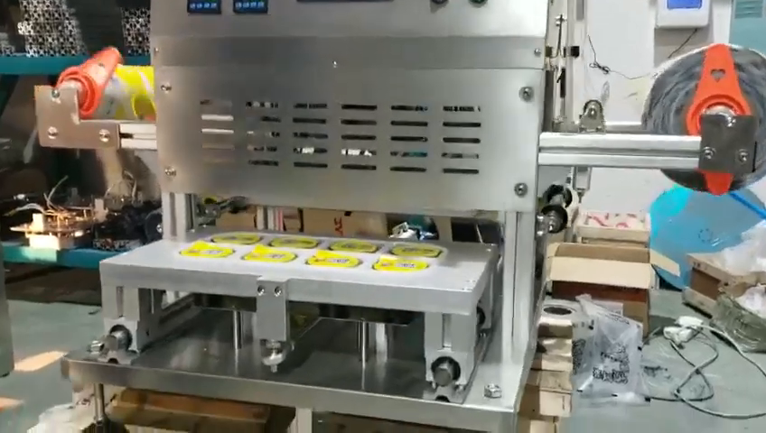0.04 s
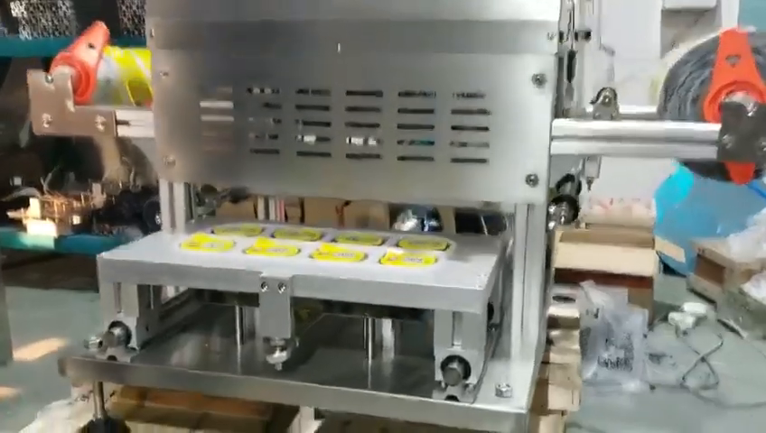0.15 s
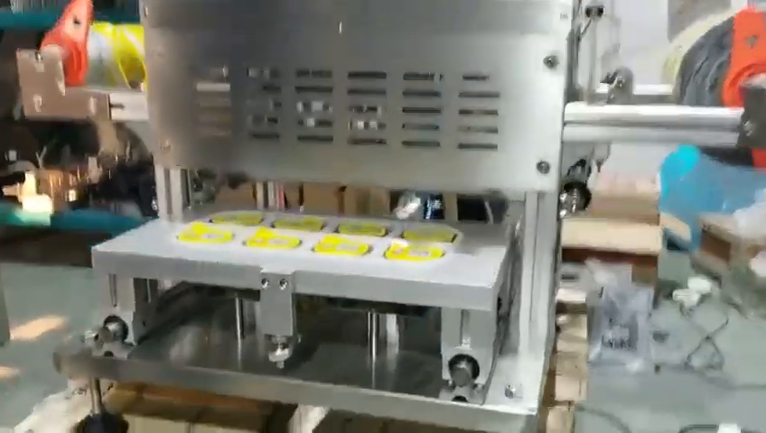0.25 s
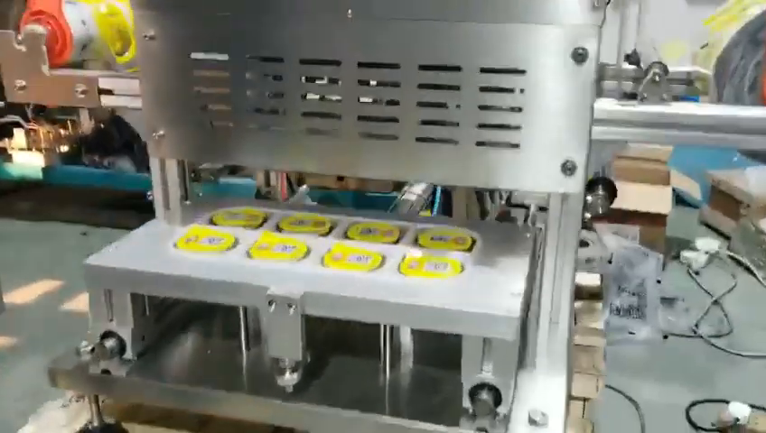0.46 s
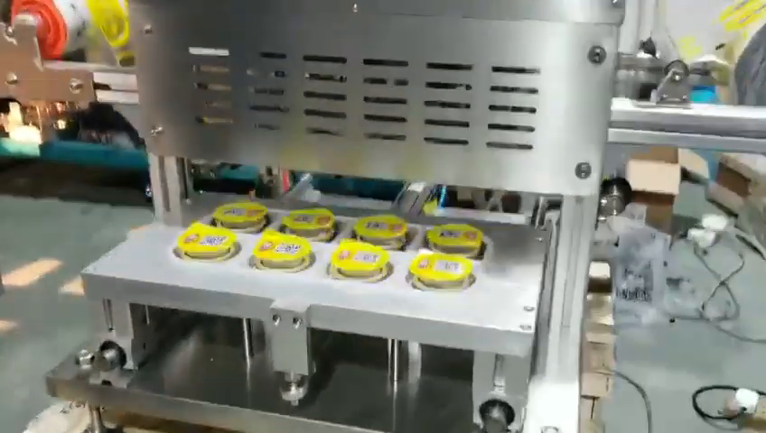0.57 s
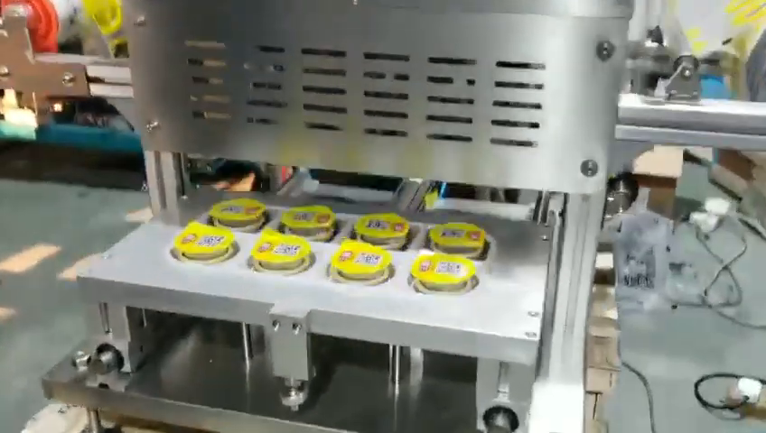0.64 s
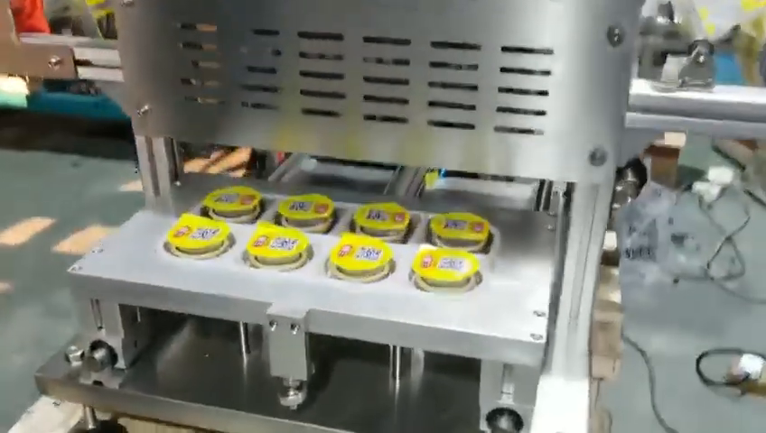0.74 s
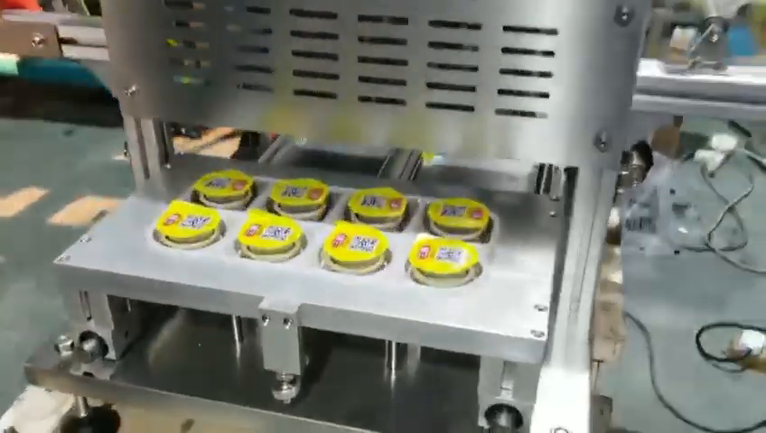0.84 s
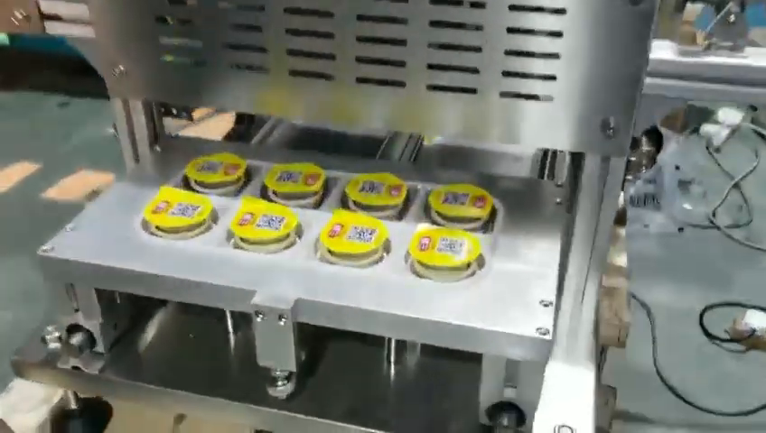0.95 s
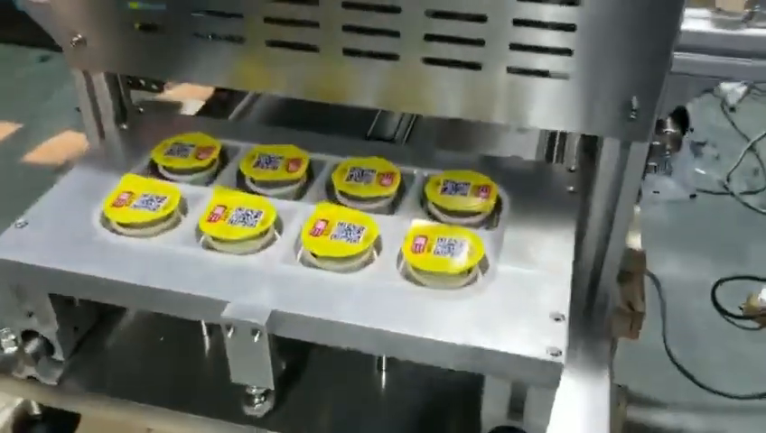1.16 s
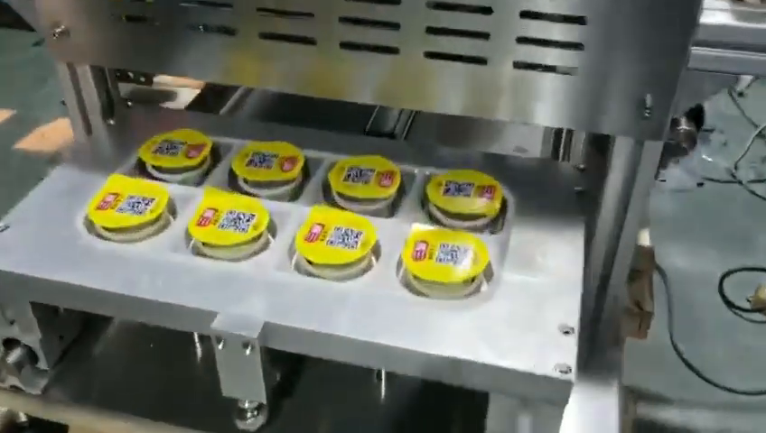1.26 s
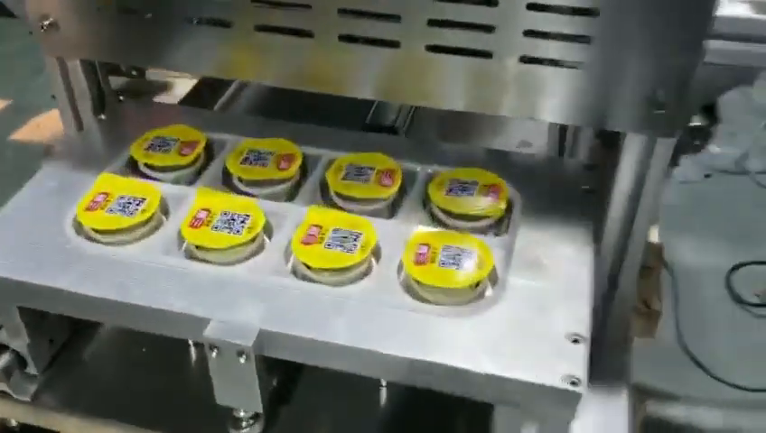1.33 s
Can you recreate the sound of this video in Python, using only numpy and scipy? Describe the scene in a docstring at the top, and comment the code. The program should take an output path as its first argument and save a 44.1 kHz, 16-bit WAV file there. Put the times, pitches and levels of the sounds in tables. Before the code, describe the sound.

Loud metallic clank of a machine tray, preceded by a quiet pneumatic puff and slide, followed by a short bright jangle, fading low boom and tiny ticks, heard close in a humming workshop.

```python
"""A workshop hums; the tray of a sealing machine is released with a thump and a hiss of air, and slides.
It hits its end stop: steel clacks, a loose bracket chatters and rings near 4 kHz, panels shudder, the frame booms.
Struck parts are sums of decaying sine modes; air, sliding, panels, ticks and workshop are coloured noise.
Narrow noise bands make the hum, and a sparse-tap room adds the tail."""
import sys
import numpy as np
from scipy import signal
from scipy.fft import rfft, irfft
from scipy.io import wavfile
from scipy.ndimage import uniform_filter1d

SR = 44100
rng = np.random.default_rng(int(sys.argv[2]) if len(sys.argv) > 2 else 0)


def digitize_waveform(pressure):
    """Quantize a signal to 16-bit integers and store it at the path in sys.argv[1].

    Rows of a 2-D input are taken as channels; values are limited to [-1, 1].
    """
    field = np.atleast_2d(pressure).T
    bounded = np.clip(field, -1, 1)
    quanta = np.round(bounded * 32767).astype(np.int16)
    wavfile.write(sys.argv[1], SR, quanta)


N = 61739


def amp(db):
    """Amplitude ratio of a level in dB."""
    return 10 ** (np.asarray(db) / 20)


def unit_rms(x):
    """Scale to rms 1."""
    return x / np.sqrt(np.mean(x ** 2) + 1e-20)


def at_hz(points, hz):
    """Interpolate a (Hz, value) curve over log frequency."""
    point_hz, value = np.transpose(points)
    return np.interp(np.log(hz + 1), np.log(point_hz + 1), value)


def envelope(curve):
    """Gain of a (s, dB) curve, dropping to -120 dB outside it."""
    time_s, level_db = np.transpose(curve)
    return amp(np.interp(np.arange(N) / SR, time_s, level_db, -120, -120))


def add(mix, start_s, sound):
    """Add a sound into the mix in place, cut at the end."""
    part = mix[..., round(start_s * SR):][..., :sound.shape[-1]]
    part += sound[..., :part.shape[-1]]


def panned(pan_db):
    """Left and right gains for an L-R difference in dB."""
    return amp([[pan_db / 2], [-pan_db / 2]])


def noise(colour, patchy_db, flicker_db):
    """Stereo noise of rms 1: spectral patches drift, all bands share a flicker."""
    # stereo likeness: hz, left_right_correlation
    likeness = [(60, 0.91), (180, 1), (540, 0.76), (1640, 0.051), (4930, -0.23), (14800, 0.03)]
    # stereo balance: hz, left_minus_right_db
    balance = [(60, 1), (240, -0.5), (940, 0.0), (3740, 0.0), (14800, -4.0)]
    frames, hz = N // 128 + 5, np.fft.rfftfreq(512, 1 / SR)
    a, b, c, d, patches = rng.standard_normal((frames, 257, 5)).T
    patches = uniform_filter1d(patches, size=6, axis=0)  # over frequency
    patches = unit_rms(uniform_filter1d(patches, size=12, axis=1))  # over time
    flicker = unit_rms(uniform_filter1d(rng.standard_normal(frames), size=4))
    same = np.clip(at_hz(likeness, hz), -1, 1)[:, None]
    left = a + 1j * b
    right = same * left + np.sqrt(1 - same ** 2) * (c + 1j * d)
    spectra = np.array([left, right / amp(at_hz(balance, hz))[:, None]])
    spectra *= amp(at_hz(colour, hz)[:, None] + patchy_db * patches + flicker_db * flicker)
    return unit_rms(signal.istft(spectra, nperseg=512, noverlap=384)[1][:, :N])


def ring(modes, rise_s, tilt_db=0, length=1, scatter=0, wander=0):
    """One blow: modes rise and die; scatter (rad) offsets L/R phase, wander (share) detunes each mode."""
    hz, db, t60_s = np.transpose(modes)[:, :, None]
    t = np.arange(int(1.2 * length * t60_s.max() * SR)) / SR
    octaves = np.log2(hz / np.median(hz))
    gain = amp(db + tilt_db * octaves - 60 * t / (t60_s * length))
    shift, detune = rng.standard_normal((2, len(modes), 1))
    side = np.array([1, -1])[:, None, None]
    phase = 2 * np.pi * hz * (1 + wander * detune) * t + scatter * shift * side
    tones = (gain * np.sin(phase)).sum(1) / np.linalg.norm(gain[:, 0])
    return tones * np.sin(np.pi / 2 * np.minimum(t / rise_s, 1)) ** 2


def puff(bed, start_s, level_db, t60_s):
    """A short burst cut from a noise bed: linear rise, exponential decay."""
    rise_s = .0012
    first = round(start_s * SR)
    t = np.arange(min(2000, N - first)) / SR
    return amp(level_db - 60 * t / t60_s) * np.minimum(t / rise_s, 1) * bed[:, first:][:, :len(t)]


def steel_clacks():
    """Steel on steel: sharp-edged mode bursts, each with its own brightness and damping."""
    # clacks: start_s, level_db, brightness_db_per_octave, t60_ratio
    clacks = [(0.212, -42, 0.5, 6.7), (0.314, -30.5, 20, 2.5), (.3200, -40, 19, 1.2), (.4349, -2.5, 2, .3),
              (.4375, -3.5, 1, .5), (0.4415, -14.5, 12, 0.59), (.4800, -18.5, -34, 0.63),
              (0.488, -14, -17, 0.8), (0.496, -26.5, -41, 1.17)]
    # steel modes: hz, relative_db, t60_s before the ratio
    steel = [(1708, 2.5, 0.033), (2213, -1, 0.12), (2490, -29, .05), (2646, 21, 0.029), (2900, 8, 0.033),
             (3105, 10, 0.054), (3315, 5.5, 0.034), (3656, 1.5, 0.12), (4030, -9, .06), (4500, 2.5, 0.061),
             (5805, -16.5, 0.12)]
    out = np.zeros((2, N))
    for start_s, level_db, tilt_db, length in clacks:
        add(out, start_s, amp(level_db) * ring(steel, .0003, tilt_db, length, scatter=0.32, wander=0.012))
    return out


def bracket():
    """Loose bracket: close modes beat; each contact lifts the ring and is damped after its own length."""
    # contacts, each damped after its own ring length: start_s, level_db, ring_length_s, left_minus_right_db
    contacts = [(0.403, -19, 0.013, 14), (0.418, -21.5, .016, -10), (.4365, -13, .0065, 0),
                (.4484, -6.5, .0112, -1), (0.463, -6.5, 0.0047, 3), (0.4643, -7, .012, -3.5),
                (0.4764, -15, 0.011, 9), (0.4854, -20.5, 0.014, 9.5), (0.499, -26.5, 0.0087, 4),
                (.5190, -50, 0.0058, 0), (0.5268, -28.5, 0.0085, 5), (0.559, -40.5, 0.0085, 11)]
    # bracket modes: hz
    mode_hz = [3885, 3967, 4027, 4060, 4118, 4153, 4187]
    # strength of the same modes: relative_db
    mode_db = [-6, -9, -3, -16, 3, -12, -5]
    in_step_s = .4506  # modes align here, apart from the scatter
    rise_s, stop_s, t60_s, scatter_rad = .0018, .003, 0.2, .65
    now = np.arange(N) / SR
    shift = scatter_rad * rng.standard_normal(len(mode_hz)) * np.array([[1], [-1]])
    tones = np.zeros((2, N))
    for k, (hz, db) in enumerate(zip(mode_hz, mode_db)):
        tones += amp(db) * np.cos(2 * np.pi * hz * (now - in_step_s) + shift[:, [k]])
    swing = np.zeros((2, N))
    t = now[:2000]
    for start_s, level_db, length_s, pan_db in contacts:
        rise = np.minimum(t / rise_s, 1)
        stop = np.clip(1 - (t - length_s) / stop_s, 0, 1)
        add(swing, start_s, amp(level_db - 60 * t / t60_s) * panned(pan_db) * (rise * stop) ** 2)
    return swing * tones / np.linalg.norm(amp(mode_db))


def tray_stop():
    """Tray against its end stop: short-lived modes of the tray."""
    # hits: start_s, level_db, brightness_db_per_octave
    hits = [(.3884, -11.5, 2), (.3932, -28, 1), (.4045, -30, -2), (.4160, -30, -10.5)]
    # tray modes: hz, relative_db, t60_s
    tray = [(760, -3.5, 0.089), (883, -4.5, .06), (1576, -9, 0.068), (2250, -7.5, 0.066), (2480, 1.5, .04),
            (3430, -2, 0.0398), (3960, -4.5, 0.074), (4670, -5.5, .04), (8960, -35, 0.032),
            (10900, -20, .03)]
    out = np.zeros((2, N))
    for start_s, level_db, tilt_db in hits:
        add(out, start_s, amp(level_db) * ring(tray, .0006, tilt_db, scatter=.4))
    return out


def frame_boom():
    """Blows into the frame: low modes with long decay, slightly detuned at each blow."""
    # blows: start_s, level_db, brightness_db_per_octave
    blows = [(0.3924, -23.5, 0.5), (.4050, -30.5, -6.5), (.4190, -26.5, 2), (.4340, -20.5, -3),
             (.4410, -24, 8), (.4580, -27, 4.5), (.4750, -31.5, 3.5), (.4980, -25.5, 1), (0.516, -28, -7),
             (.5720, -44.5, -2)]
    # frame modes: hz, relative_db, t60_s
    frame = [(128.7, -13.5, .5), (168.2, 2.5, 0.38), (188.5, -0.5, .4), (221, -4.5, 0.62), (258.6, -4, .4),
             (470.3, -14.5, 0.56), (658, -13, 0.37), (722.7, -16, 0.3), (1012, -21.5, 0.11)]
    out = np.zeros((2, N))
    for start_s, level_db, tilt_db in blows:
        add(out, start_s, amp(level_db) * ring(frame, 0.0017, tilt_db, scatter=.05, wander=0.0095))
    return out


def cylinder_thump():
    """Release thump of the air cylinder: one blow on its modes."""
    # cylinder modes: hz, relative_db, t60_s
    cylinder = [(99.3, -13, 0.45), (118, 3, 0.13), (197, -12, 0.27), (319.6, -6.5, 0.16), (424, 4.5, 0.063),
                (474, 0.5, 0.08), (600, -4, 0.045), (764, -18, 0.4), (982, -4, 0.11), (1410, -9.5, 0.023),
                (2520, -14, 0.44)]
    start_s, level_db = .2092, -15.5
    out = np.zeros((2, N))
    add(out, start_s, amp(level_db) * ring(cylinder, 0.00065, scatter=.1))
    return out


def air_hiss():
    """Escaping air: patchy coloured noise under a level curve."""
    # air level: time_s, level_db
    air_level = [(0.195, -63), (0.201, -41.5), (0.215, -29.5), (0.255, -41.5), (0.303, -45.5),
                 (0.319, -36.5), (0.347, -52), (0.378, -62)]
    # air spectrum: hz, relative_db_per_hz
    air_colour = [(1760, -21), (3000, -4.5), (4550, -4.5), (5470, -34), (6480, -12.5), (7630, -26.5),
                  (10400, -8), (15300, -21.5)]
    return envelope(air_level) * noise(air_colour, patchy_db=2.7, flicker_db=1.3)


def tray_slide():
    """Sliding tray: coloured friction noise."""
    # slide level: time_s, level_db
    slide_level = [(0.198, -49.5), (0.214, -32), (0.284, -42), (0.32, -39.5), (0.366, -37), (0.378, -37.5)]
    # slide spectrum: hz, relative_db_per_hz
    slide_colour = [(35, -33.5), (60, -0.5), (389, -16.5), (454, 2), (667, -11.5), (763, -11), (891, -10.5),
                    (1000, -4.5), (2080, -21.5), (2430, -4), (6000, -33.5), (7800, -54.5), (13200, -120)]
    return envelope(slide_level) * noise(slide_colour, patchy_db=2.2, flicker_db=0.89)


def panel_shudder():
    """Loose panels around the stop: uneven coloured noise."""
    # shudder level: time_s, level_db
    shudder_level = [(.370, -35.5), (.387, -39), (.392, -26.5), (.43, -32), (.44, -24), (.50, -28),
                     (.53, -35), (.6, -39.5), (.8, -60.5)]
    # shudder spectrum: hz, relative_db_per_hz
    shudder_colour = [(60, -23), (200, 0), (480, -3), (680, -2), (1300, -12.5), (1720, -7), (2900, 1.5),
                      (3600, -11), (4100, 7.5), (4600, -17.5), (5300, -32), (7500, -31), (11500, -21.5),
                      (15300, -33)]
    return envelope(shudder_level) * noise(shudder_colour, patchy_db=3, flicker_db=2.2)


def small_ticks():
    """Small ticks: panned bursts from one noise bed."""
    # ticks: start_s, level_db, left_minus_right_db
    ticks = [(0.138, -50.5, -28), (0.315, -58, 6), (0.388, -26, 1), (0.4336, -28, 2), (0.448, -28.5, -4),
             (0.4818, -25, 1), (0.5291, -29.5, 0), (0.6427, -45, 13), (0.8402, -48, -2),
             (0.9126, -43, -1.5), (1.0273, -46, -7), (1.1306, -55, -8.5), (1.3542, -45, -4.0)]
    # tick spectrum: hz, relative_db_per_hz
    tick_colour = [(2350, -44), (4000, 9), (5760, -18.5), (7460, -4.5), (7930, -7), (11400, 2),
                   (15300, -21.5)]
    out = np.zeros((2, N))
    bed = noise(tick_colour, 0, 0)
    for start_s, level_db, pan_db in ticks:
        add(out, start_s, panned(pan_db) * puff(bed, start_s, level_db, t60_s=0.025))
    return out


def late_snap():
    """A part settles: one noise burst, identical in both channels."""
    # snap spectrum: hz, relative_db_per_hz
    snap_colour = [(530, -42), (900, -38), (1740, 5), (2390, -5), (4330, -0.5), (5240, -28), (6000, -50),
                   (7800, -80), (13200, -120)]
    start_s, level_db, t60_s = .9120, -38, 0.041
    out = np.zeros((2, N))
    mono_bed = noise(snap_colour, 0, 0)[[0, 0]]
    add(out, start_s, puff(mono_bed, start_s, level_db, t60_s))
    return out


def room(x):
    """Mono-fed reverb: sparse taps of random sign, each band dying at its own speed."""
    # room decay: hz, t60_s
    decay = [(150, 0.31), (600, 0.98), (2500, 0.17), (4100, 0.85), (9000, 0.18)]
    same = 0.5  # left-right likeness
    taps = np.zeros((2, SR))
    slots = np.arange(300, SR - 20, 20)  # one tap per 20 samples
    at = slots + rng.integers(0, 20, (2, len(slots)))
    np.put_along_axis(taps, at, rng.choice([-1., 1.], at.shape), 1)
    taps[1] = same * taps[0] + np.sqrt(1 - same ** 2) * taps[1]
    hz, t, spectra = signal.stft(taps, SR, nperseg=256)
    fading = spectra * amp(-60 * t / at_hz(decay, hz)[:, None])
    tail = signal.istft(fading, SR, nperseg=256)[1]
    return signal.fftconvolve(x.mean(0)[None], tail / np.linalg.norm(tail[0]), axes=1)[:, :N]


def workshop():
    """Background of the workshop: patchy coloured noise, slowly getting quieter."""
    # workshop level: time_s, level_db
    shop_level = [(0, -44.5), (.2, -45.5), (.7, -46.5), (1.0, -49.5), (1.4, -49)]
    # workshop spectrum: hz, relative_db_per_hz
    shop_colour = [(15, -55), (25, -21), (54, -6.5), (192, -2), (220, -11), (304, -5), (338, -5.5),
                   (506, -9.5), (548, -6), (777, -12), (1230, -15.5), (4450, -16), (8030, -33.5),
                   (11100, -25.5), (15300, -29.5)]
    return envelope(shop_level) * noise(shop_colour, patchy_db=3.2, flicker_db=0.64)


def hum():
    """Wavering machine hum: narrow noise bands, louder early on while the machine is under pressure."""
    # hum bands: hz, width_hz, settled_rms_db
    rumble = [(59, 12, -59), (99, 17, -64.5), (199, 38, -62.5)]
    early_db, settle_s = 7.5, 0.32
    bin_hz, t = np.fft.rfftfreq(N, 1 / SR), np.arange(N) / SR
    out = np.zeros(N)
    for hz, width_hz, rms_db in rumble:
        spectrum = rfft(rng.standard_normal(N)) * np.exp(-((bin_hz - hz) / width_hz) ** 2)
        out += amp(rms_db) * unit_rms(irfft(spectrum, N))
    return out * amp(early_db * np.exp(-(t / settle_s) ** 2))


def scene():
    """All sources direct; knocks, air, slide, bracket and booms also feed the room."""
    jangle = bracket()
    bright = steel_clacks() + tray_stop() + small_ticks() + late_snap() + air_hiss() + tray_slide()
    low = cylinder_thump() + frame_boom()
    bright_send_db, bracket_extra_db, low_send_db = -14.5, -15, -21
    send = amp(bright_send_db) * (bright + amp(bracket_extra_db) * jangle) + amp(low_send_db) * low
    return jangle + bright + low + panel_shudder() + room(send) + workshop() + hum()


def record(dry):
    """The low cut of the microphone and the band limit of the recorder."""
    low_cut_hz, edge_hz = 58, 15450
    low_cut = signal.butter(3, low_cut_hz, "high", fs=SR, output="sos")
    thinned = signal.sosfilt(low_cut, dry)
    band_limit = signal.firwin(511, edge_hz, window=("kaiser", 9), fs=SR)
    return signal.oaconvolve(thinned, band_limit[None], "same")


dry = scene()
out = record(dry)
digitize_waveform(out)
```